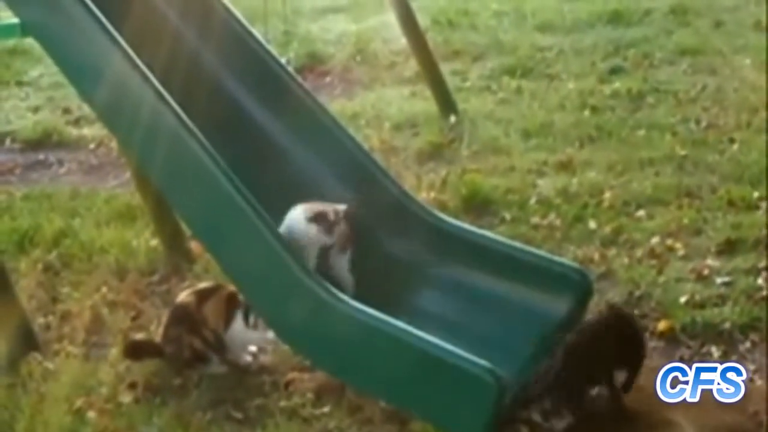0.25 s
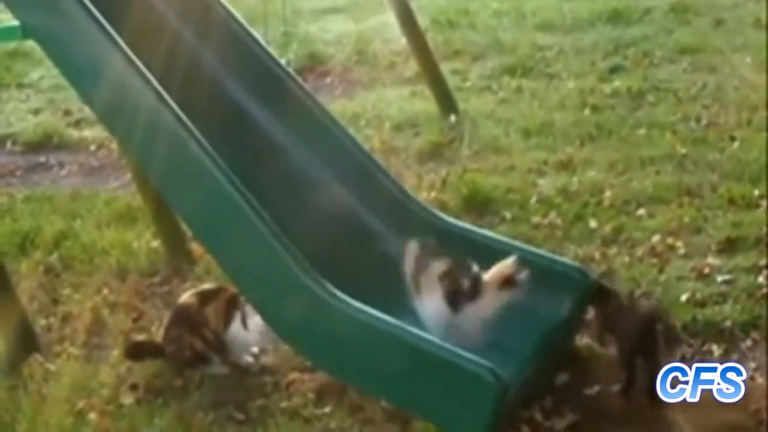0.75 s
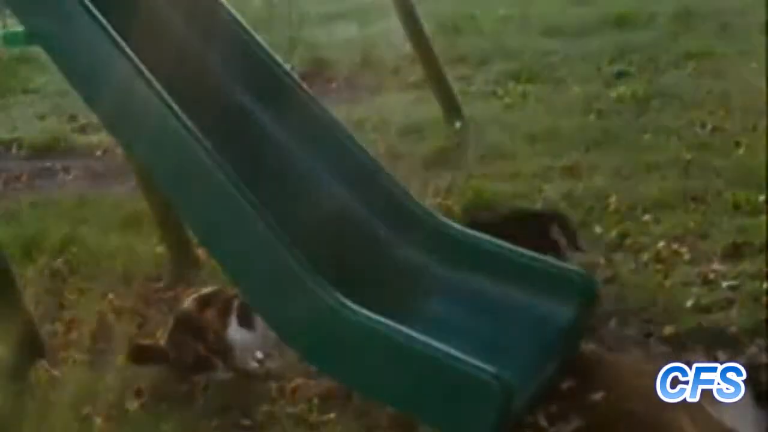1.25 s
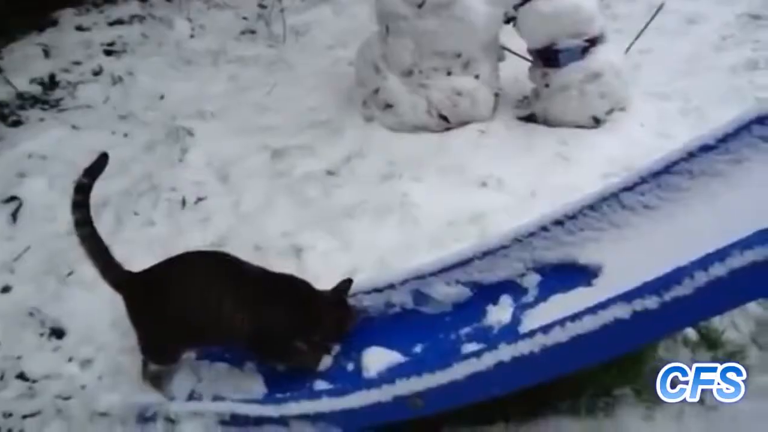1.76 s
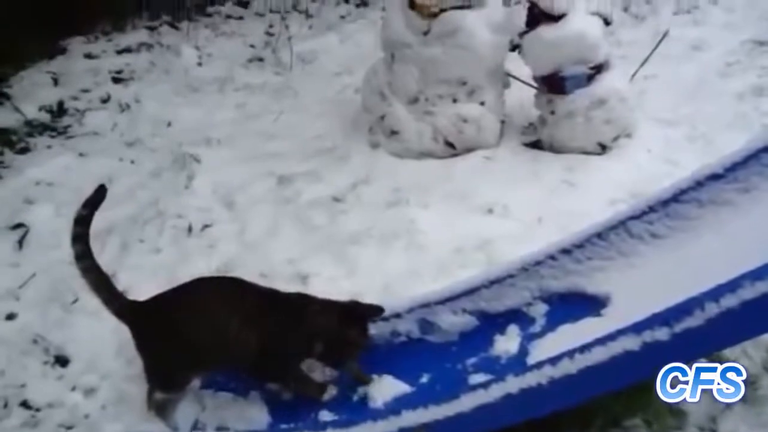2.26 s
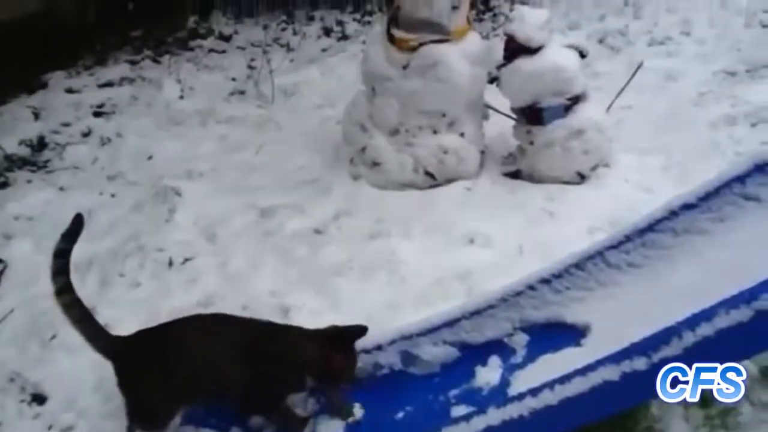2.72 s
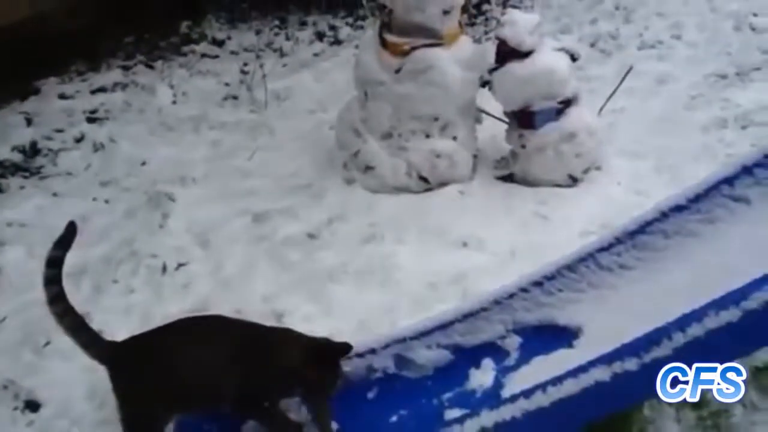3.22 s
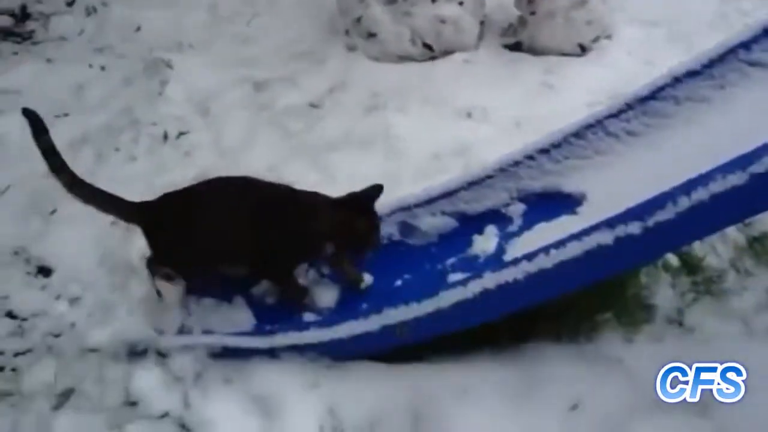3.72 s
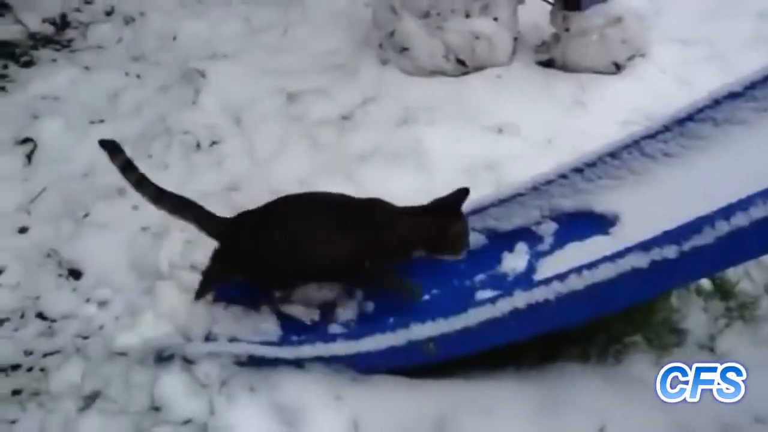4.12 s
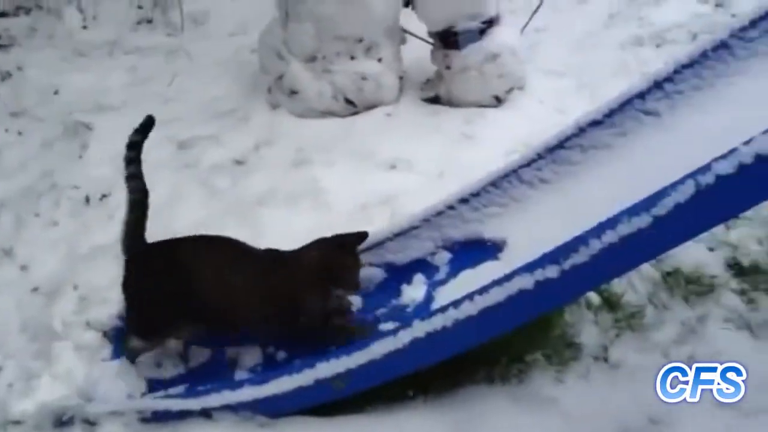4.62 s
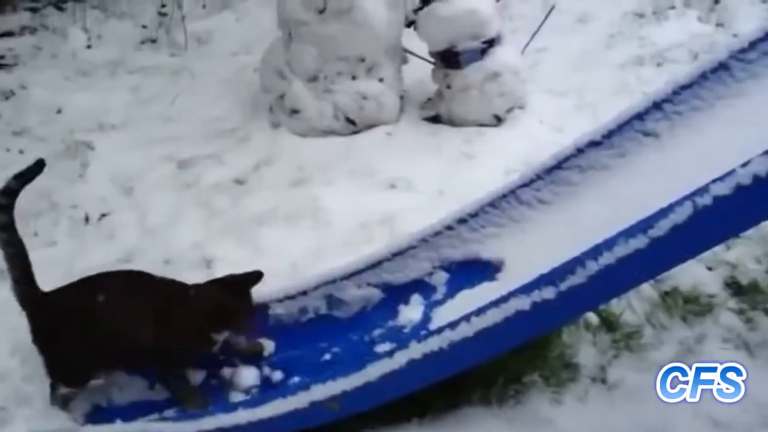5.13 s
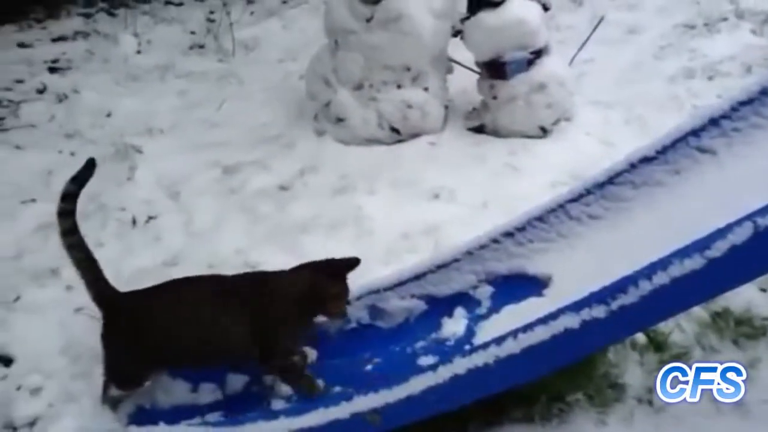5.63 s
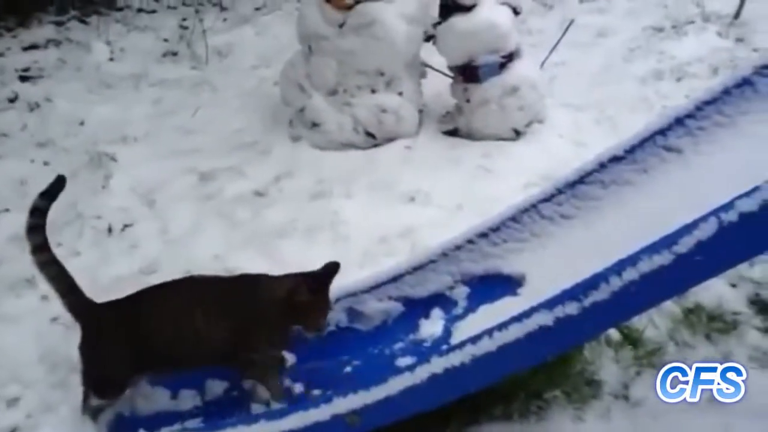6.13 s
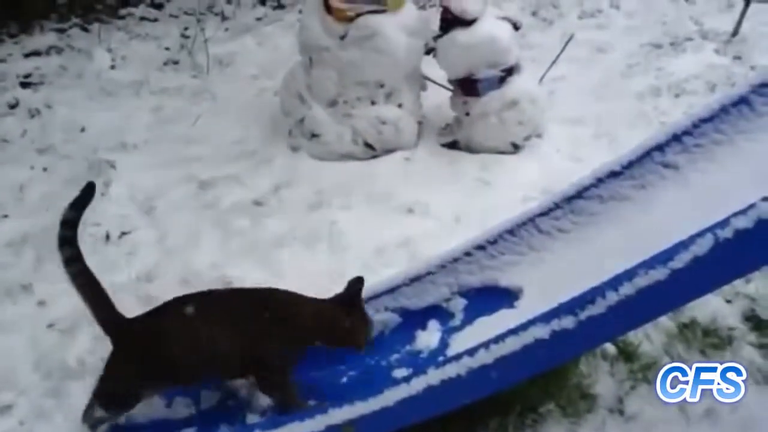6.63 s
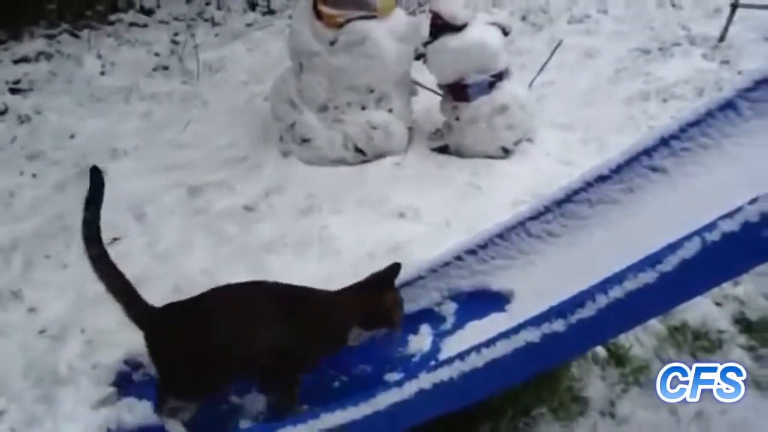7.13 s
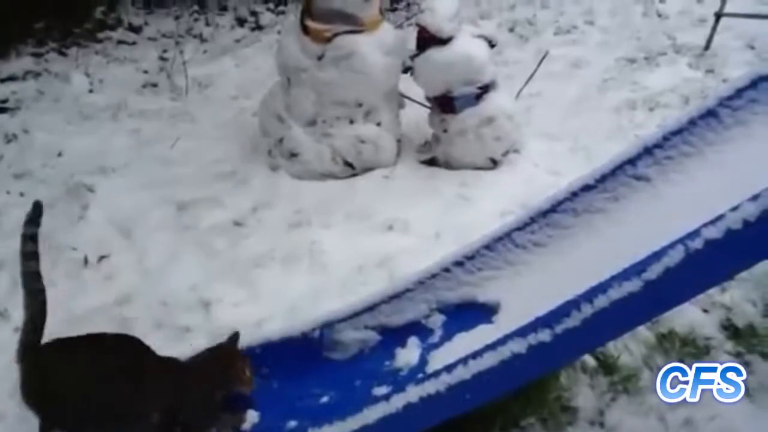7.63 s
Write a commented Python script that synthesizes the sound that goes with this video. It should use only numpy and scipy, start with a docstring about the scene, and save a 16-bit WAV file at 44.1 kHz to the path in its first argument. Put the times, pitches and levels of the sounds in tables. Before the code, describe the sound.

A kitten's paws knock dully on a hollow plastic slide in muffled outdoor noise, then a cat scrapes and swipes gritty snow on another slide.

```python
"""First a kitten scrabbles down a hollow plastic slide on a lawn and leaps off its end: dull ringing knocks in
outdoor noise. Then a cat paws at a snowy slide: pads and claws are short pushes with scattered waves, and each
swipe is a gritty hiss of tiny snow clicks. Snow rustles, squeaks and creaks as tuned noise or slips. Filtered
noise makes the winter air. Once the whole snowy scene falls almost silent for a moment and then comes back
abruptly."""
import sys
import numpy as np
from scipy import signal
from scipy.fft import rfft, irfft
from scipy.io import wavfile
from scipy.ndimage import uniform_filter1d, map_coordinates

SR = 44100
rng = np.random.default_rng(int(sys.argv[2]) if len(sys.argv) > 2 else 0)


def to_wav(s):
    """Save 16-bit WAV."""
    ch = np.atleast_2d(s).T  # columns
    pcm = np.round(np.clip(ch, -1, 1) * 32767)  # PCM
    wavfile.write(sys.argv[1], SR, pcm.astype(np.int16))


N = 347067
TIME = np.arange(N) / SR

# Contact levels are rms near the start of each sound, before the shell rings along.
# kitten's paws on the bare slide: (time [s], level [dB], pitch [Hz], time for the push to fall 60 dB [s])
KITTEN_STEPS = [(.1005, -34, 780, 0.029), (.1095, -29.5, 300, 0.059), (.1225, -32.5, 603, 0.047),
                (.172, -37.5, 650, 0.019), (.184, -34, 260, 0.063), (.212, -38, 294, 0.033),
                (1.049, -34.5, 520, 0.038), (1.052, -38.5, 210, .05), (1.082, -31.5, 278, 0.054),
                (1.087, -34, 564, 0.13), (1.1027, -20, 1300, 0.0065), (1.1035, -27, 250, 0.043),
                (1.112, -31.5, 276, 0.07), (1.214, -34, 330, 0.033), (1.224, -37, 560, 0.082)]
# cat's pads landing on the snowy slide: (time [s], level [dB], pitch [Hz])
PAD_THUMPS = [(2.2745, -56.5, 890), (2.279, -47, 198), (2.768, -37, 1030), (2.773, -42, 332),
              (3.3654, -42, 1077), (4.363, -36.5, 183), (4.413, -46.5, 263), (4.625, -47, 700),
              (4.7145, -38.5, 800), (4.72, -37, 312), (4.8114, -30, 955), (4.8125, -33, 1530),
              (4.817, -31, 750), (4.825, -41.5, 296), (5.622, -40.5, 240.5), (5.955, -51, 432),
              (6.033, -53.5, 610), (6.457, -38.5, 192.8), (6.753, -44.5, 197.5), (7.049, -41.5, 261.7),
              (7.088, -52, 827), (7.46, -44.5, 485), (7.469, -37, 208), (7.493, -29, 184),
              (7.533, -40, 660), (7.539, -32.5, 248), (7.592, -42, 237.7), (7.6365, -38.5, 579),
              (7.639, -42.5, 227), (7.717, -41, 618), (7.723, -33, 222), (7.762, -40, 194.3)]
# claws and ice grains clicking on plastic: (time [s], level [dB], pitch [Hz], time to fall 60 dB [s])
CLAW_CLICKS = [(2.274, -40.5, 2560, 0.012), (2.7682, -37, 1960, 0.02), (2.7727, -42, 3954, .005),
               (2.893, -34, 5016, .004), (2.9115, -37, 4950, 0.0044), (2.921, -32, 5000, .004),
               (3.3663, -41, 2980, 0.019), (3.3815, -42, 4000, 0.012), (3.4005, -40, 4770, 0.014),
               (3.43, -45, 7935, 0.007), (4.711, -30.5, 4500, 0.0042), (5.6155, -28.5, 2833, .016),
               (5.626, -34.5, 3980, 0.0095), (6.0308, -31, 1912, 0.034), (6.0402, -31, 3740, 0.016),
               (6.051, -34, 3950, 0.0048), (6.4514, -30, 3212, 0.013), (6.4575, -35, 3990, 0.01),
               (6.462, -41, 4020, 0.0086), (6.753, -42.5, 4440, 0.015), (7.0535, -39, 4343, 0.0095),
               (7.5315, -28, 5967, 0.015), (7.635, -32.5, 4430, 0.0087), (7.6373, -23.5, 4094, 0.011),
               (7.7505, -30, 5020, 0.0088), (7.7758, -35.5, 4034, 0.006)]
# a paw drags through snow: (full contact [s], lets go [s], attack [s per 20 dB], release [s per 20 dB],
# swell over the drag [dB], rubbing [dB], coarse crunch [dB], fine powder [dB], hiss pitch before braking [Hz])
PAW_SWIPES = [(2.009, 2.016, 0.055, 0.084, 0, -58, -58, -56.5, 3900),
              (2.274, 2.281, 0.061, .15, 0, -56, -58.5, -55.5, 4040),
              (2.521, 2.587, 0.027, 0.049, 11.5, -51, -49.5, -50.5, 3600),
              (2.789, 2.794, 0.016, 0.071, -2, -39.5, -44.5, -49.5, 4050),
              (2.842, 2.917, 0.056, 0.098, 5, -37.5, -52.5, -42, 3940),
              (3.385, 3.41, 0.018, .09, 0.5, -48, -53, -65, 4276),
              (3.461, 3.518, 0.048, 0.06, 5, -52.5, -55.5, -51, 4160),
              (3.643, 3.758, 0.026, 0.24, 0.5, -69, -69.5, -62, 4200),
              (3.909, 3.94, 0.047, 0.082, 0, -64.5, -72, -66, 4010),
              (4.192, 4.215, .03, 0.077, 0, -64, -66, -65, 3980),
              (4.279, 4.317, 0.024, 0.083, 0.5, -51, -55, -49, 4160),
              (4.358, 4.363, .02, 0.023, 0, -59, -52, -56, 4200),
              (4.415, 4.43, 0.019, 0.058, 0, -55.5, -54.5, -54, 4205),
              (4.49, 4.497, 0.023, 0.036, 0, -57, -57, -57.5, 4185),
              (4.548, 4.6, 0.017, 0.064, 3, -53, -56.5, -48.5, 4200),
              (4.655, 4.718, 0.039, 0.063, 9, -48, -48.5, -47, 4210),
              (4.729, 4.796, .03, 0.042, -3, -45, -53, -43.5, 3980),
              (4.814, 4.846, 0.017, 0.056, 1, -36.5, -38.5, -46.5, 3690),
              (5.07, 5.146, .03, 0.097, -4, -38.5, -45.5, -49, 3640),
              (5.197, 5.229, 0.0514, 0.064, 0, -50, -49.5, -63, 3400),
              (5.696, 5.761, 0.059, 0.095, 5, -39.5, -55, -51, 4130),
              (5.811, 5.851, .06, 0.055, 2, -30.5, -65, -51.5, 4370),
              (6.05, 6.095, 0.011, 0.097, -0.5, -39, -50, -55, 4027),
              (6.15, 6.257, .07, 0.043, 6, -34.5, -64, -54, 4460),
              (6.525, 6.655, 0.088, 0.051, -8, -42, -55, -52, 4230),
              (6.782, 6.812, 0.053, 0.049, -0.5, -56.5, -58, -55, 4140),
              (7.055, 7.068, 0.043, 0.077, -0.5, -51.5, -51, -53, 4000),
              (7.114, 7.21, 0.046, 0.076, 1, -54.5, -60.5, -52, 4106),
              (7.239, 7.284, 0.076, .1, 0.5, -45.5, -52.5, -51, 4105),
              (7.32, 7.338, 0.048, 0.059, 0.5, -37, -52, -45.5, 4275),
              (7.394, 7.409, 0.016, 0.081, 0, -38.5, -57, -48.5, 4760),
              (7.459, 7.532, 0.044, 0.058, 9, -41.5, -47.5, -40.5, 4096),
              (7.56, 7.69, 0.037, 0.088, -6, -45, -50, -44, 4250),
              (7.715, 7.762, .02, .12, -1.5, -45.5, -50, -42, 4196)]
# tone colours of the three parts of a swipe: (frequency [Hz], relative level [dB per Hz])
RUB_COLOUR = [(1200, -18), (2000, -8.5), (2900, 4), (4000, 4.5), (5300, 3.5), (7200, -4), (9500, -18),
              (15000, -14)]
CRUNCH_COLOUR = [(400, -10), (750, 0.5), (1100, -0.5), (1700, -1), (2400, -1), (4000, -5.5)]
POWDER_COLOUR = [(4000, -32.5), (7000, 0), (10000, 1), (12000, -4), (15000, -2.5)]
# ringing tones of the hollow plastic shell: (frequency [Hz], relative level [dB], time to fall 60 dB [s])
SHELL_TONES = [(170, 1, 0.09), (268, 2, 0.26), (350, -11.5, 0.44), (426, -4.5, 0.12), (510, -6, 0.023),
               (595, -6, 0.039), (740, -3.5, .04), (934, -2, 0.042), (1450, -11.5, 0.053),
               (1710, -1.5, 0.055), (2450, -3, 0.075), (2650, 0, 0.018), (3470, -5.5, .025)]
# squeaks (narrow resonance) and faint rustles (wide resonance) in the snow:
# (start [s], end [s], pitch [Hz], width of each resonance [Hz], rms level [dB])
SNOW_SQUEAKS_AND_RUSTLES = [(3.23, 3.264, 3180, 600, -67), (4.117, 4.146, 2940, 2500, -61),
                            (5.343, 5.39, 3900, 2020, -66), (4.65, 4.743, 937, 119.7, -55),
                            (5.065, 5.173, 1092, 141.5, -46.5), (5.058, 5.14, 1622, 178.8, -48.5),
                            (5.153, 5.25, 1060, 221.7, -50), (5.73, 5.768, 2936, 299.3, -44),
                            (5.845, 5.908, 1031, 160.5, -56), (6.095, 6.118, 1048, 202, -52.5),
                            (7.012, 7.047, 751, 400, -44.5), (7.382, 7.419, 4866, 906, -41)]
# reflections of the snow sounds from slide walls and ground: (delay [s], level [dB])
WALL_REFLECTIONS = [(.0009, -46), (.0023, -35.5), (.0047, -17.5), (0.0099, -13.5)]
# tone colours of lawn noise, winter rumble, distant rush, thin hiss: (frequency [Hz], relative level [dB per Hz])
LAWN_COLOUR = [(12, -28), (20, 3.5), (25, -10.5), (32, -22.5), (43, -22), (192, -3), (327, -1.5), (367, -9),
               (597, 0), (825, -9), (1110, -9.5), (1340, -16), (3450, -23.5), (4350, -32.5), (5000, -61.5),
               (6500, -86), (11000, -120)]
RUMBLE_COLOUR = [(30, -49), (60, -25.5), (95, -16.5), (135, -5), (200, -1), (290, -1), (380, -3),
                 (480, -19.5), (700, -27)]
RUSH_COLOUR = [(300, -9.5), (450, 3), (560, 0), (740, -3), (950, -6), (1250, -18), (1800, -19.5),
               (3000, -27)]
HISS_COLOUR = [(1000, 5.5), (3000, -1.5), (6000, 1), (11000, 0), (15000, -1.5)]
# winter noise before the gains below, one list each side of the silence: (time [s], rumble [dB], rush [dB])
WINTER_LEVELS = [
    [(1.8, -53.5, -55), (2.22, -51.5, -55.5), (2.51, -58, -56.5), (4.15, -58.5, -59.5), (4.3, -59.5, -57.5)],
    [(5.27, -54, -58), (5.92, -49.5, -58), (6.48, -56.5, -59.5), (6.94, -51.5, -61), (7.43, -58, -58)],
]

SNOW_STARTS_S, SILENCE_START_S, SILENCE_END_S = 1.755, 4.847, 5.0705
LAWN_DB, HISS_DB = -40.5, -63
RUMBLE_GAIN_DB, RUSH_GAIN_DB = 2.26, 0.3
LAWN_CUT_HZ, PAD_LOW_CUT_HZ, FINAL_CUT_HZ = 5500, 130, 15200
# The hiss dips slightly in pitch as pressure grows, and sinks much more as the paw brakes.
PITCH_OCTAVES_PER_DB = -0.01
BRAKE_OCTAVES, BRAKE_S, BRAKE_LEAD_S = 0.4, 0.055, 0.014
POWDER_RELEASE_SHARE = 0.83   # the spray stops sooner than the rubbing
TAIL_DB, TAIL_S_PER_20_DB = -23, 0.17   # slower, faint outdoor reverberation after each swipe
# A deeper thump rings longer: fall time at the reference pitch, and how steeply it shortens above.
PAD_T60_S, PAD_REFERENCE_HZ, PAD_SHORTENING = 0.082, 200, 0.41


def swipes(rest_hz):
    """A paw rubs over the plastic, crushes packed snow and sprays powder."""
    rub_grains = grains(per_s=5000, spread_db=2.5, clump_db=1.0, smooth=0.61)
    rub = patchy(colour(rub_grains, RUB_COLOUR), depth_db=2.5, size=512)
    crunch = colour(grains(per_s=2200, spread_db=1.0, clump_db=0.8, smooth=0.99), CRUNCH_COLOUR)
    powder = colour(grains(per_s=3600, spread_db=1.5, clump_db=1.0, smooth=0.65), POWDER_COLOUR)
    # A tiny starting power avoids division by zero between swipes.
    power = np.full((3, N), 1e-18)
    weighted_hz = np.full(N, 1e-18 * rest_hz)
    for start_s, stop_s, attack_s, release_s, swell_db, rub_db, crunch_db, powder_db, hz in PAW_SWIPES:
        near = slice(int((start_s - 0.2) * SR), int((stop_s + 0.5) * SR))
        t = TIME[near] - start_s
        hold_s = max(stop_s - start_s, 1e-3)
        drag = swipe_envelope(t, hold_s, attack_s, release_s, swell_db)
        spray = swipe_envelope(t, hold_s, attack_s, POWDER_RELEASE_SHARE * release_s, swell_db)
        gains = [from_db(rub_db) * drag, from_db(crunch_db) * drag, from_db(powder_db) * spray]
        parts = np.square(gains)
        power[:, near] += parts
        # The louder a rub, the more it decides the pitch.
        weighted_hz[near] += parts[0] * hz * swipe_pitch(t, hold_s, swell_db)
    # A faster paw meets the same grains sooner.
    travel = np.cumsum(weighted_hz / power[0] / rest_hz)
    rub = map_coordinates(rub, [travel % (N - 1)], order=3)
    return np.sum(np.sqrt(power) * [rub, crunch, powder], axis=0)


def grains(per_s, spread_db, clump_db, smooth):
    """Snow crystals break in clumps, as tiny clicks of uneven size over smooth friction."""
    size_db = spread_db * np.minimum(rng.exponential(1, N), 4)
    sizes = from_db(size_db) * rng.choice([-1, 1], N)
    clicks = rms_one(sizes * (rng.random(N) < per_s / SR))
    friction = smooth * rng.standard_normal(N)
    return (clicks + friction) * from_db(clump_db * drift(220))


def swipe_envelope(t, hold_s, attack_s, release_s, swell_db):
    """The drag grows, swells or eases while held, then fades with a slow, faint tail; about 1 in mid-hold."""
    before = np.maximum(-t, 0)
    after = np.maximum(t - hold_s, 0)
    pressure_db = swell_db * (np.clip(t / hold_s, 0, 1) - 0.5)
    tail = from_db(TAIL_DB - 20 * after / TAIL_S_PER_20_DB)
    release = np.hypot(from_db(-20 * after / release_s), tail)
    return from_db(pressure_db - 20 * before / attack_s) * release


def swipe_pitch(t, hold_s, swell_db):
    """Pressure and braking shift the hiss, as a share of its pitch at the drag's end without braking."""
    pressure_db = swell_db * (np.clip(t / hold_s, 0, 1) - 1)
    braking = np.clip((t - hold_s + BRAKE_LEAD_S) / BRAKE_S, 0, 1)
    return 2 ** (PITCH_OCTAVES_PER_DB * pressure_db - BRAKE_OCTAVES * braking)


def cat_pads():
    """Soft pads thump the shell, with deeper thumps lasting longer."""
    thumps = []
    for s, db, hz in PAD_THUMPS:
        t60 = PAD_T60_S * (PAD_REFERENCE_HZ / hz) ** PAD_SHORTENING
        thumps.append((s, db, hz, t60))
    pads = contacts(thumps, width=0.38, scatter=0.91, bottom=0.34, top=2.6)
    return signal.sosfilt(signal.butter(2, PAD_LOW_CUT_HZ, "high", fs=SR, output="sos"), pads)


def cat_claws():
    """Hard claws and ice grains give short, bright clicks on the plastic."""
    return contacts(CLAW_CLICKS, width=0.7, scatter=0.49, bottom=0.064, top=3.1)


def kitten_paws():
    """The kitten's steps knock on the hollow slide and are heard without treble."""
    paws = contacts(KITTEN_STEPS, width=0.34, scatter=0.57, bottom=0.4, top=1.5)
    return low_pass(shell(paws, ring_db=0.5), hz=2900, order=5)


def contacts(rows, width, scatter, bottom, top):
    """Each contact is a push followed by scattered bending waves; its softness sets the pitch."""
    out = np.zeros(N)
    t = TIME[:SR // 5]
    for s, db, hz, t60 in rows:
        waves = rng.standard_normal(len(t))
        force = scatter * np.sqrt(hz / SR) * waves * from_db(-60 * t / t60)
        force[0] += 1
        edges_hz = [bottom * hz, min(top * hz, 0.45 * SR)]
        band = signal.butter(2, edges_hz, "band", fs=SR, output="sos")
        blow = signal.sosfilt(band, resonate(force, hz, width * hz))
        # Count all the energy as if it fell in the first quarter of the fall time.
        opening_rms = np.sqrt(np.sum(blow ** 2) / (t60 * SR / 4))
        add(out, s, from_db(db) * blow / opening_rms)
    return out


def shell(x, ring_db):
    """The hollow slide rings on after a blow, as a sum of fading tones."""
    ring = np.zeros(N)
    for hz, db, t60 in SHELL_TONES:
        ring += from_db(db) * resonate(x, hz, np.log(1000) / (np.pi * t60))
    return x + from_db(ring_db) * ring


def squeaks_and_rustles():
    """Noise through a narrow resonance squeaks, through a wide one it rustles; each swells and fades."""
    out = np.zeros(N)
    for start_s, end_s, hz, width_hz, db in SNOW_SQUEAKS_AND_RUSTLES:
        noise = rng.standard_normal(SR // 2)
        tone = resonate(resonate(noise, hz, width_hz), hz, width_hz)
        tone = tone[-max(int((end_s - start_s) * SR), 2):]   # keep the end, where the tone is settled
        swell = signal.windows.tukey(len(tone), 0.4)
        add(out, start_s, from_db(db) * rms_one(tone * swell))
    return out


def creak(start_s, end_s, period_s, hz, width_hz, db):
    """Packed snow gives way under a paw in a few quick slips; db is the peak level."""
    slips = np.zeros(N)
    for s in np.arange(start_s, end_s, period_s):
        add(slips, s + rng.normal(0, period_s / 7), rng.uniform(0.49, 1, size=1))
    sound = resonate(resonate(slips, hz, width_hz), hz, hz)
    return from_db(db) * sound / np.abs(sound).max()


def reflected(x):
    """Nearby hard surfaces return the sound within milliseconds."""
    out = x.copy()
    for delay_s, db in WALL_REFLECTIONS:
        add(out, delay_s, from_db(db) * x)
    return out


def winter():
    """The cat on the snowy slide: blows ring the shell, snow sounds reflect, and the air lies beneath."""
    snow = swipes(rest_hz=3990) + squeaks_and_rustles()
    snow = snow + creak(start_s=7.014, end_s=7.044, period_s=0.0065, hz=1000, width_hz=400, db=-39)
    return shell(cat_pads() + cat_claws(), ring_db=-6) + reflected(snow) + winter_air()


def lawn():
    """The kitten on the bare slide in outdoor noise."""
    return kitten_paws() + lawn_air()


def lawn_air():
    """Outdoor noise wavers slightly in level and has no high treble."""
    air = from_db(LAWN_DB) * colour(rng.standard_normal(N), LAWN_COLOUR)
    return low_pass(air * from_db(0.5 * drift(8.7)), LAWN_CUT_HZ, order=7)


def winter_air():
    """A low outdoor rumble and a distant rush wander separately over a thin hiss."""
    s, rumble_db, rush_db = np.vstack(WINTER_LEVELS).T
    rumble = colour(rng.standard_normal(N), RUMBLE_COLOUR)
    rumble = rumble * from_db(RUMBLE_GAIN_DB + np.interp(TIME, s, rumble_db))
    rush = colour(patchy(rng.standard_normal(N), depth_db=3.0, size=1024), RUSH_COLOUR)
    rush = rush * from_db(RUSH_GAIN_DB + np.interp(TIME, s, rush_db))
    hiss = colour(patchy(rng.standard_normal(N), depth_db=3.0, size=512), HISS_COLOUR)
    return rumble + rush + from_db(HISS_DB) * hiss


def patchy(x, depth_db, size):
    """Narrow patches of pitch swell and fade on their own, each for a few frames of size samples; rms 1."""
    frames = signal.stft(x, nperseg=size)[2]
    swell = uniform_filter1d(rng.standard_normal(frames.shape), size=3, axis=0)
    swell = uniform_filter1d(swell, size=4, axis=1)
    return rms_one(signal.istft(frames * from_db(depth_db * rms_one(swell)), nperseg=size)[1][:N])


def colour(x, spectrum):
    """Give x a smooth spectrum that falls 7.1 dB per octave beyond its ends; rms 1."""
    hz, db = np.transpose(spectrum)
    octave = np.log2(np.arange(N // 2 + 1) * SR / N + 1)   # the 1 avoids the logarithm of zero
    known = np.log2(hz)
    beyond = np.abs(octave - np.clip(octave, known[0], known[-1]))
    gain_db = np.interp(octave, known, db) - 7.1 * beyond
    return rms_one(irfft(rfft(x) * from_db(gain_db), N))


def drift(rate):
    """Slow random wander with spread 1, given rate new points a second."""
    points = rng.standard_normal(8000)
    return rms_one(np.interp(TIME * rate, np.arange(len(points)), points))


def resonate(x, hz, width_hz):
    """One resonance, with gain about 1 at its top."""
    r = np.exp(-np.pi * width_hz / SR)
    feed = np.array([1, 0, -1]) * (1 - r * r) / 2
    feedback = [1, -2 * r * np.cos(2 * np.pi * hz / SR), r * r]
    return signal.lfilter(feed, feedback, x + 1e-18)


def low_pass(x, hz, order):
    """Steep treble cut."""
    return signal.sosfilt(signal.ellip(order, 0.3, 85, hz, fs=SR, output="sos"), x)


def from_db(db):
    """Decibels to gain."""
    return 10 ** (np.asarray(db) / 20)


def rms_one(x):
    """Scale to unit rms."""
    return x / np.sqrt(np.mean(x ** 2) + 1e-20)


def add(out, s, sound):
    """Mix a sound in at time s."""
    at = int(round(s * SR))
    out[at:at + len(sound)] += sound[:N - at]


def scene():
    """The lawn gives way to the snow, which once fades quickly and later returns at once."""
    snowy = np.clip((TIME - SNOW_STARTS_S) / 0.002, 0, 1)
    fade = np.exp(-np.maximum(TIME - SILENCE_START_S, 0) / 0.0086)
    audible = np.where(TIME < SILENCE_END_S, fade, 1)
    faint_hiss = from_db(-88.5) * rng.standard_normal(N)   # stays on through the silence
    return ((1 - snowy) * lawn() + snowy * audible * winter() + faint_hiss)[None]


def record(dry):
    """The highest treble is cut."""
    return low_pass(dry, FINAL_CUT_HZ, order=12)


dry = scene()
out = record(dry)
to_wav(out)
```